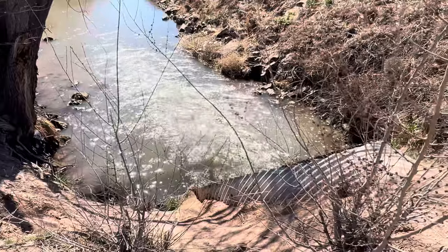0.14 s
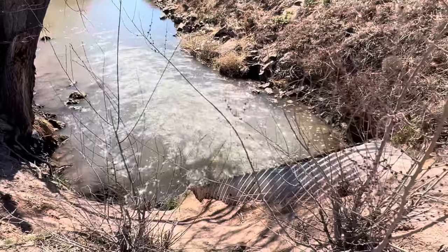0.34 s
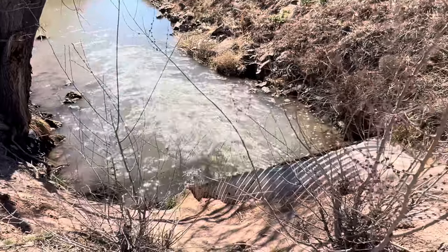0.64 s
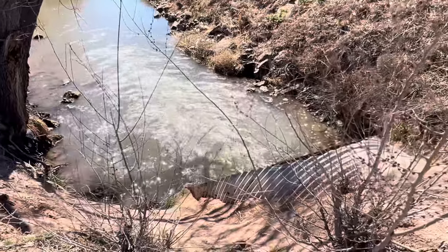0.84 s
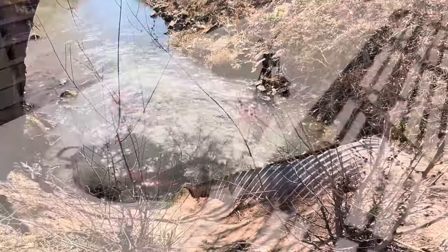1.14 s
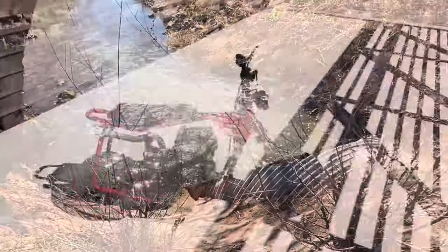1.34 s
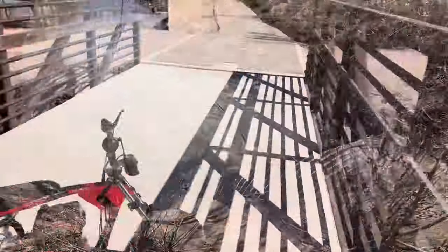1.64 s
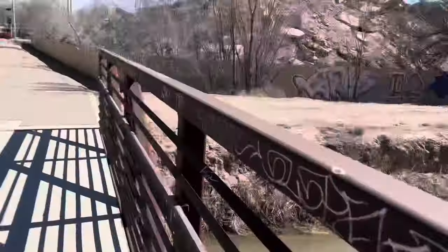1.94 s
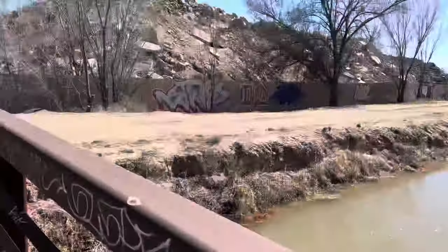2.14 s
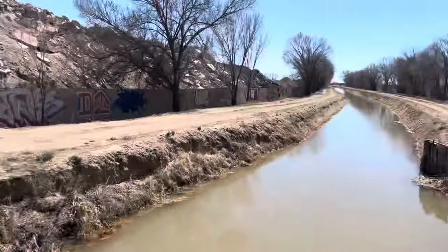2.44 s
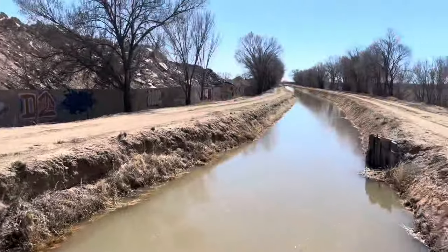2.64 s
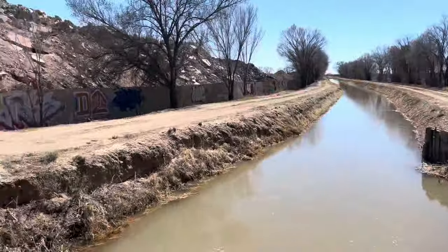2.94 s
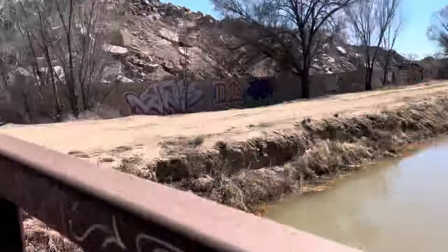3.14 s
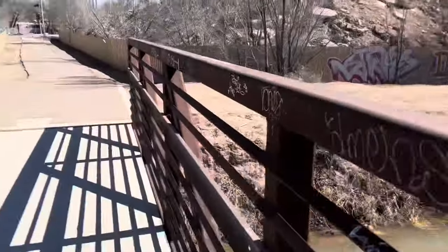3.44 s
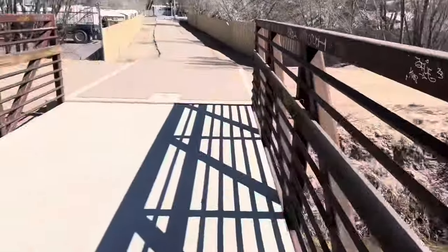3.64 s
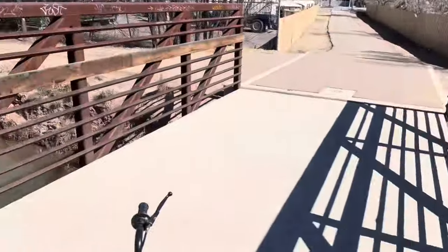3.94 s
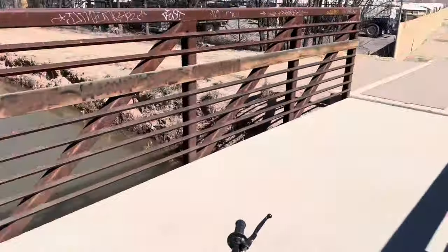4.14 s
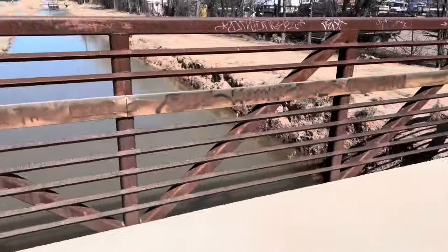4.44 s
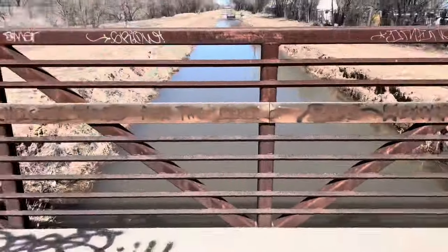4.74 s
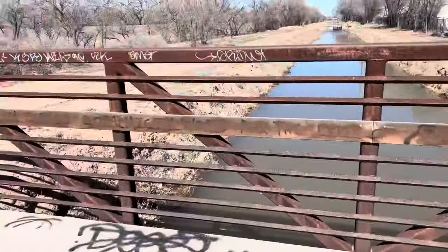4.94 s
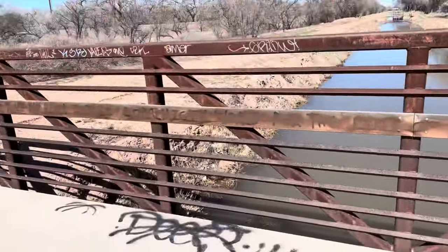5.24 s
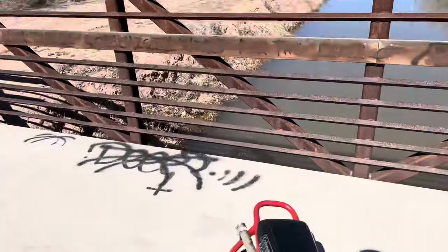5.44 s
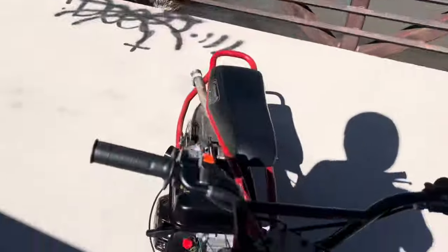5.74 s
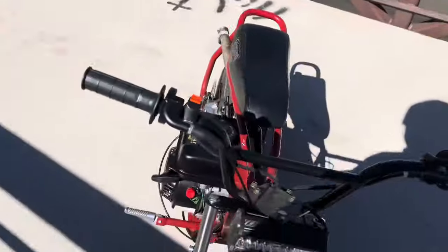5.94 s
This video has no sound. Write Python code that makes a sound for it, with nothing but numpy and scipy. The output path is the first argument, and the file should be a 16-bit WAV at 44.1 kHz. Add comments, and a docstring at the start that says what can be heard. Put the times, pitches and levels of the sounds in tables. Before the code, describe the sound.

Quiet creek trickle with soft wind bumps on the microphone gives way to a small single-cylinder motorbike idling unevenly close by, chugging and clattering metallically.

```python
"""A quiet creek bank first: wind rumbles and bumps on the microphone, water trickles, ticks and plops.
From about one second the bank dissolves into a concrete footbridge where a mini bike idles close by.
Its single-cylinder four-stroke fires unevenly about 13 times a second: each firing knocks with a falling
pitch, thumps from the muffler, barks from the tailpipe and rings the fins; valves clack, covers clatter.
The listener walks round it, beside, then behind, then over; one cover rings on late in the walk."""
import sys
import numpy as np
from scipy import signal
from scipy.fft import rfft, irfft, next_fast_len
from scipy.io import wavfile
from scipy.ndimage import uniform_filter1d, map_coordinates

SR = 44100
rng = np.random.default_rng(int(sys.argv[2]) if len(sys.argv) > 2 else 0)


def int16_out(signal):
    """Quantize to a 16-bit WAV file."""
    q = np.round(np.clip(np.atleast_2d(signal).T, -1, 1) * 32767)
    wavfile.write(sys.argv[1], SR, q.astype(np.int16))


N = 268569

# crossfade from the creek bank to the bridge
FADE_START_S, FADE_S = 0.96, 0.95
# gusts on the creek bank: start_s [s], level_db [dB]
GUSTS = [(0, -32), (0.13, -44), (0.3, -38.5), (0.5, -44.5), (0.66, -38), (1, -40)]
# colour of wind on the microphone: pitch_hz [Hz], level_db [dB]
WIND_COLOUR = [(15, -55), (26, -34), (36, -18), (55, 15.5), (95, 3.5), (150, 0.5), (300, -7.5), (600, -68)]
# colour of the running creek: pitch_hz [Hz], level_db [dB]
CREEK_COLOUR = [(100, -11), (300, 1), (550, -1), (1100, -3), (2000, -13), (3500, -16.5), (5600, -26.5),
                (8000, -19.5), (11000, -37), (15000, -51)]
BRIDGE_WIND_DB, CREEK_DB = -43, -51.5
# tiny bubbles bursting in the creek: rate, middle pitch, level of the faintest
DRIPS_PER_S, DRIP_HZ, DRIP_MIN_DB = 60, 4800, -60.5
# soft bumps on the microphone: centre_s [s], level_db [dB], length_s [s]
BUMPS = [(0.066, -29.5, 0.007), (0.19, -39, 0.0086), (0.237, -30.5, 0.0053), (0.616, -41, 0.034),
         (0.655, -42, 0.0062), (0.706, -39.5, 0.019), (0.778, -46, 0.011), (0.91, -36.5, 0.018),
         (0.981, -35, 0.0091)]
# colour of the noise in a bump: pitch_hz [Hz], level_db [dB]
BUMP_COLOUR = [(50, -3.5), (130, -0.5), (330, -3.5), (480, -13.5), (900, -27), (2000, -61)]
# small plops in the creek: start_s [s], pitch_hz [Hz], level_db [dB, relative]
PLOPS = [(.298, 1100, -49.5), (0.349, 2450, -55), (0.358, 1040, -49), (0.393, 1010, -57)]

# the listener's path round the bike: time_s [s], left_ear_lead_ms [ms]
PATH = [(1, 0.17), (1.8, 0.43), (2.6, 0.31), (3.4, 0.36), (4, 0.34), (4.4, 0.27), (4.8, 0.15), (5.3, 0.14),
        (5.9, 0.32)]
# when the listener stands beside, behind and over the bike: time_s [s]
STATIONS = [3.5, 4.73, 5.88]
# the lope of the idle, strong and weak firings often taking turns: start_s [s], muffler thump_db [dB],
# tailpipe bark_db [dB], combustion knock_db [dB], valve clack_db [dB]
FIRINGS = [(0.983, -14.0, -25.0, -22, -30), (1.065, -17, -26.0, -29, -30.5), (1.1438, -17.5, -27, -22, -31),
           (1.2229, -16, -17.5, -22, -31), (1.301, -12, -21, -21, -26), (1.3798, -14, -24, -21, -31),
           (1.4613, -24.5, -21, -25, -26), (1.5368, -14, -26.0, -21, -24.5), (1.617, -23, -24, -23, -25),
           (1.6932, -22, -27, -26, -20), (1.769, -13.5, -21, -17, -19.5), (1.846, -17, -35.0, -19, -18),
           (1.924, -20.5, -26.5, -20.5, -21.5), (2.0, -17.5, -26, -23, -21), (2.077, -13.5, -30, -18, -23),
           (2.1554, -15.5, -37, -18.5, -21.5), (2.2335, -18.5, -36.0, -22, -22.5),
           (2.31, -15.5, -44, -19.5, -23), (2.3884, -12.5, -32, -17.5, -27),
           (2.468, -16.0, -33, -19.5, -31), (2.5482, -18.0, -33, -19, -34), (2.627, -19, -40, -21.5, -27),
           (2.7071, -13, -31, -19.5, -29), (2.79, -24, -29.0, -42, -25), (2.8664, -14, -34, -19, -28),
           (2.9458, -28.0, -29.5, -28, -32), (3.025, -17, -36, -18, -22.5), (3.104, -25, -25, -26, -22.5),
           (3.1819, -11.5, -24.5, -16, -25), (3.262, -24, -20.5, -29, -22), (3.341, -16.0, -27, -16, -28),
           (3.418, -28, -20, -23, -31), (3.4974, -14.5, -24, -15.5, -30),
           (3.5759, -15.5, -22.5, -15.5, -30), (3.6551, -16.5, -26.0, -17.5, -23),
           (3.7322, -23, -16.5, -24, -20.5), (3.809, -18, -23, -15, -22), (3.8862, -22.0, -17.5, -22, -25),
           (3.9622, -16.5, -20, -18, -25.5), (4.038, -16, -18, -20, -23), (4.1183, -17, -20, -31, -22),
           (4.19, -12.5, -16.5, -15.5, -21.5), (4.267, -20, -16.5, -23, -17.5),
           (4.3441, -11.5, -13.0, -16.5, -20), (4.4225, -10.0, -11.5, -11.5, -30),
           (4.5026, -20, -15.0, -19, -25), (4.582, -11.0, -11.5, -14.5, -28),
           (4.6637, -21.0, -14.5, -22, -25), (4.7439, -10.0, -10.5, -13, -35),
           (4.829, -20, -12.0, -30, -30), (4.9059, -13.5, -12.5, -15.5, -22),
           (4.9873, -15.5, -15, -16, -28), (5.0684, -14, -14.0, -20.5, -28), (5.149, -16, -15.5, -17, -30),
           (5.23, -27, -15.0, -20, -35), (5.3079, -14, -16, -17, -26), (5.3884, -28, -13.5, -18, -20),
           (5.469, -14, -18, -23.5, -21), (5.5426, -12, -18.5, -14.5, -19), (5.62, -17.5, -16, -18.5, -17),
           (5.6971, -10.5, -17.5, -13.5, -18), (5.7778, -24, -14, -20, -22), (5.853, -11, -19, -13.5, -29),
           (5.9345, -26, -13, -22, -35), (6.0093, -10.0, -15, -13.5, -26)]

# impacts in one engine cycle: position [share of the cycle], half_rise_s [s], decay_s [s],
# crankcase_db [dB], shroud_db [dB], rocker_db [dB], tin_db [dB]
IMPACTS = [(.035, 0.0031, 0.014, 1.5, 2, 4, 0.5), (.27, 0.004, 0.014, -3, -3, -4, -1.5),
           (.51, .002, .013, -15, -14, -1.5, -1.5)]
# the shaking eases while the piston slows on compression
LULL_DB, LULL_BEFORE_S, LULL_WIDTH_S = -3, 0.011, 0.0047
TICKS_PER_S = 160  # loose parts that click on their own
# broad colour of crankcase, fan shroud, rocker cover and tin covers: pitch_hz [Hz], level_db [dB]
CASE_COLOUR = [(120, -1.5), (300, -6.5), (520, -0.5), (800, -4.5), (1100, -11), (2000, -54)]
SHROUD_COLOUR = [(500, -20.5), (850, 1.5), (1400, 3), (1700, 0), (2200, -71), (4000, -50)]
ROCKER_COLOUR = [(1200, -20.5), (1800, 2.5), (2700, -0.5), (3300, -9.5), (4200, -5.5), (7000, -49)]
TIN_COLOUR = [(2200, -24), (3400, -2.5), (5000, 2.5), (6700, 4), (7300, -2), (8400, 1.5), (10300, -3),
              (12300, -7), (13800, -15), (15500, -8.5)]
# resonances of the same parts: pitch_hz [Hz], width_hz [Hz],
# then strength against the colour from beside_db, behind_db, over_db [dB]
CASE_MODES = [(409, 37, -16, 9.5, -3), (536, 107, 5, -31, 10), (596, 116, 9, 5, -4), (740, 45, 7, 13, 5)]
SHROUD_MODES = [(1070, 73, 3, 1.5, -5), (1260, 120, -12, 4, -5), (1376, 59, 3, -4.5, 2.5)]
ROCKER_MODES = [(2010, 28, -1, -6, -14), (2414, 35, -1.5, -1, -5), (2695, 31, -10, -17, -11)]
TIN_MODES = [(3210, 160, 5, 8.9, 5), (4350, 24, 8, 4, -4), (4540, 30, 7, 8, 4), (6510, 23, 5, 1, -10),
             (8150, 220, -5, 5.7, 0), (10800, 220, -1, 4.7, 6), (11590, 160, -14, 5, -3)]
# likeness of the clatter at the two ears: pitch_hz [Hz], likeness [0 to 1]
CLATTER_LIKENESS = [(300, 0.98), (550, 0.99), (1100, 0.78), (2000, 0.63), (4000, 0.092), (6500, 0.15),
                    (8200, 0.25), (10000, 0.97)]
# clatter along the walk: time_s [s], crankcase_db [dB, relative], top_end_db [dB, relative]
CLATTER = [(2, -33.5, -28), (2.7, -31.5, -29.5), (3.2, -31, -28), (4, -26.5, -24), (4.8, -27.5, -28),
           (5.4, -26, -28), (6, -22.5, -28.5)]
CASE_DB = -3  # over the crankcase column
SHROUD_DB, ROCKER_DB, TIN_DB = -1, -5, -5.5  # over the top end column
# lean of the tin covers: pitch_hz [Hz], left_over_right_db [dB]
TIN_SIDE = [(2800, 11.5), (4000, 5.5), (6300, 10.5), (8500, 2), (11000, -0.5)]
# fixed phase between left and right in the high treble, laid on the tin covers' part: pitch_hz [Hz], left_lead
# [radians]
TREBLE_PHASE = [(6000, 2.2), (8200, .3), (9000, -1), (10000, -3.1), (10600, -3.2), (11500, -6.1),
                (12800, -6.3), (13400, -9.3), (14200, -9.4), (14900, -12.5)]
# change of the tin covers' colour from above: pitch_hz [Hz], change_db [dB]
TIN_ABOVE = [(3300, 2), (4800, -3.5), (6200, -4), (8200, 1), (11500, 0.5)]

# tappet click: pitch_hz [Hz], level_db [dB], swell_s [s]
TAPPET = [(2670, -3.5, .0035)]
# the knock falls steeply as the pressure wave spreads; it starts this far above its final pitch
KNOCK_DROP_HZ, KNOCK_FALL_S, KNOCK_SWELL_S, KNOCK_DB = 3313, 0.001643, 0.004016, 3.5
# the knock is deeper behind the bike: time_s [s], final pitch_hz [Hz]
KNOCK_END = [(3.1, 297), (4.3, 139)]
# the block under the combustion: pitch_hz [Hz], level_db [dB], swell_s [s]
BLOCK = [(1393, -5.5, 0.00499), (1250, -2.5, 0.00161), (2300, -5, 0.001125)]
# ring of cooling fins and flywheel: pitch_hz [Hz], level_db [dB], t60_s [s]
FINS = [(1039, -16.5, 0.14), (1394, -12.5, 0.12), (1590, -20, .08), (2427, -19, 0.19), (3540, -25, 0.1),
        (4430, -24, 0.22), (4490, -24, 0.18), (6440, -28, 0.3)]
# the fins are clearest behind the bike: time_s [s], level_db [dB]
FINS_HEARD = [(3.6, -8), (4.9, 2), (5.7, -2)]
# the muffler's deep push: pitch_hz [Hz], level_db [dB], swell_s [s]
MUFFLER = [(157.7, 1, 0.0121), (73.5, -12, 0.02356)]
# the tailpipe's bark and the ring after it: pitch_hz [Hz], level_db [dB], swell_s [s]
PIPE = [(292, -1, 0.00886), (440, -7, 0.008), (240, -10.5, 0.02094)]
# air drawn in after the exhaust stroke: pitch_hz [Hz], level_db [dB], swell_s [s]
INTAKE = [(68, -31.5, 0.015)]
# clack of a valve shutting in mid-cycle, through head and case: pitch_hz [Hz], level_db [dB], swell_s [s]
VALVE = [(2710, -6, .0042), (2330, -3, .0036), (1380, -5.5, .0065), (688, -5, .0105), (494, -10.5, .0175)]
# tail of deck and railings: pitch_hz [Hz], t60_s [s]
BRIDGE_TAIL = [(150, 0.025), (1000, 0.38), (4000, 0.6), (12000, 0.32)]
# one hard firing sets a loose cover ringing
PING_S, PING_HZ, PING_DB, PING_T60_S = 4.745, 4450, -34, 0.8
TOP_HZ = 15850  # upper band limit of the recorder


def amp(db):
    """Decibels to gain."""
    return 10 ** (np.asarray(db) / 20)


def unit(x):
    """Scale to rms 1."""
    return x / np.sqrt(np.mean(x ** 2) + 1e-20)


def along(points, hz):
    """(Hz, value) points read on a log frequency axis."""
    f, v = np.transpose(points)
    return np.interp(np.log(hz + 1), np.log(f + 1), v)


def curves(rows):
    """One value per sample for each column after the time."""
    s, *columns = np.transpose(rows)
    return [np.interp(np.arange(N) / SR, s, column) for column in columns]


def wobble(rate):
    """A smooth random curve, rate knots a second."""
    knots = rng.standard_normal(int(N * rate / SR) + 4)
    return map_coordinates(knots, [np.arange(N) * rate / SR])


def filtered(x, response):
    """Filter x by a complex response of frequency."""
    m = next_fast_len(N + SR // 2)
    return irfft(rfft(x, m) * response(np.fft.rfftfreq(m, 1 / SR)), m)[..., :N]


def add(track, s, sound):
    """Mix a sound into a track at time s."""
    part = track[max(round(s * SR), 0):][:len(sound)]
    part += sound[:len(part)]


def spread(pair, likeness):
    """Two unrelated signals become left and right with a given likeness."""
    def mid_side_gains(hz):
        turn = np.arccos(np.clip(along(likeness, hz), -1, 1)) / 2
        return np.array([np.cos(turn), np.sin(turn)])

    mid, side = filtered(pair, mid_side_gains)
    return np.array([mid + side, mid - side])


def rush(colour, likeness):
    """Coloured stereo noise of rms 1."""
    noise = spread(rng.standard_normal((2, N)), likeness)
    return unit(filtered(noise, lambda hz: amp(along(colour, hz))))


def dissolve():
    """Share of the bridge in the sound, rising from 0 to 1."""
    return np.clip((np.arange(N) / SR - FADE_START_S) / FADE_S, 0, 1)


def wind(bank):
    """Low noise of moving air on the microphone, following the gusts and then steadier on the bridge."""
    level_db = bank * curves(GUSTS)[0] + (1 - bank) * BRIDGE_WIND_DB
    return amp(level_db + 0.77 * wobble(18)) * rush(WIND_COLOUR, [(60, 0.79)])


def creek(bank):
    """Running water as coloured noise whose level trickles at a slow and a fast rate."""
    trickle = amp(1.3 * wobble(39.8) + 2.1 * wobble(400))
    water = rush(CREEK_COLOUR, [(300, 0.68), (1400, 0.16), (7000, 0.43)])
    return bank * amp(CREEK_DB) * unit(trickle) * water


def drips():
    """Single tiny bubbles tick in the water; higher ones die sooner."""
    out, t = np.zeros(N), np.arange(SR // 60) / SR
    span = FADE_START_S + FADE_S
    for when, pitch, size in rng.random((int(DRIPS_PER_S * span), 3)):
        hz = DRIP_HZ * 2 ** (1.8 * (pitch - .5))
        tick = np.exp(-t * hz / 6) * np.sin(2 * np.pi * hz * t)
        add(out, when * span, amp(DRIP_MIN_DB + 14 * size ** 2) * tick)
    return out


def bumps():
    """Soft bumps on the microphone: a swell of low noise and one short push on the case."""
    t = np.arange(N) / SR
    swell = sum(amp(db) * np.exp(-((t - s) / length) ** 2 / 2) for s, db, length in BUMPS)
    out = swell * rush(BUMP_COLOUR, [(200, 0.7)])
    for s, db, _ in BUMPS:
        u = (t - s) / 0.0011
        out = out + amp(db) * (1 - u ** 2) * np.exp(-u ** 2 / 2)
    return out


def plops():
    """A few bubbles each; a bubble's pitch rises as it nears the surface."""
    out, age = np.zeros(N), np.arange(SR // 12) / SR
    shape = age / 0.0035 * np.exp(1 - age / 0.0027)
    for s, hz, db in PLOPS:
        for late, size in rng.standard_normal((4, 2)):
            cycles = hz * (1 + 0.06 * size) * age * (1 + 1.7 * age)
            add(out, s + 0.013 * abs(late), amp(db + 5.0) * shape * np.sin(2 * np.pi * cycles))
    return out


def outdoors():
    """Wind and bumps on the microphone, creek and bubbles by the bank."""
    bank = 1 - dissolve()
    return wind(bank) + creek(bank) + bank * drips() + bumps() + plops()


def shaking(index, steady_db, force, jitter, vary_db):
    """How hard one part is shaken: three impacts a cycle over steady rubbing; strong firings hit harder."""
    times, thump_db, *_ = np.transpose(FIRINGS)
    vigour_db = thump_db - uniform_filter1d(thump_db, size=5)
    power, lull, t = np.zeros(N), np.zeros(N), np.arange(SR // 10) / SR
    dip = np.exp(-((t - t.mean()) / LULL_WIDTH_S) ** 2 / 2)
    for s, period, vigour in zip(times, np.gradient(times), vigour_db):
        add(lull, s - LULL_BEFORE_S - t.mean(), dip)
        for share, half_rise, decay, *levels in IMPACTS:
            rise = 2 * half_rise
            shape = np.exp(-np.maximum(t - rise, 0) / decay) * np.minimum(t / rise, 1)
            db = levels[index] + force * vigour * (1 - share) + rng.normal(0, vary_db)
            start = s + share * period - rise + rng.normal(0, jitter)
            add(power, start, (amp(db) * shape) ** 2)
    return unit(np.sqrt(power + amp(steady_db) ** 2) * amp(LULL_DB * lull))


def patchy(x, depth_db):
    """The treble shifts in colour at random from moment to moment."""
    hz, _, z = signal.stft(x, SR, nperseg=256)
    field = rng.standard_normal(z.shape[1:])
    field = uniform_filter1d(uniform_filter1d(field, 5, 0), 7, 1)
    treble = along([(4000, 0), (9000, 1)], hz)[:, None]
    return signal.istft(z * amp(depth_db * treble * unit(field)), nperseg=256)[1][:, :N]


def rattle(shake, colour, modes, grain_db, tick_db, ring_db, t60):
    """Tiny contacts and single clicks ring one part; its resonances stand out by where one listens."""
    ticks = unit((rng.random(N) < TICKS_PER_S / SR) * rng.uniform(-1.16, 1, (2, N)))
    grain = rng.standard_normal((2, N)) * amp(grain_db * wobble(700))
    contacts = shake * spread(grain + amp(tick_db) * ticks, CLATTER_LIKENESS)
    contacts = patchy(contacts, depth_db=3)
    t, out = np.arange(SR // 12) / SR, 0
    for k, here in enumerate(np.eye(len(STATIONS))):
        metal = rng.standard_normal(len(t)) * amp(-60 * t / t60)
        metal = metal[None] / np.linalg.norm(metal)
        rung = contacts + amp(ring_db) * signal.oaconvolve(contacts, metal, axes=1)[:, :N]

        def response(f):
            peaks = sum(amp(db[k]) * 1j * f * w / (c * c - f * f + 1j * f * w) for c, w, *db in modes)
            return amp(along(colour, f)) * (1 + peaks)

        nearness = np.interp(np.arange(N) / SR, STATIONS, here)
        out = out + nearness * filtered(rung, response)
    return unit(out)


def clatter():
    """Crankcase, fan shroud and rockers answer the same cycle of impacts."""
    case_db, top_db = curves(CLATTER)
    shake = shaking(index=0, steady_db=-3.5, force=0.05, jitter=0.00076, vary_db=0.0)
    case = rattle(shake, CASE_COLOUR, CASE_MODES, grain_db=1.0, tick_db=-5.5, ring_db=-20.5, t60=0.026)
    shake = shaking(index=1, steady_db=-7, force=0.14, jitter=0.00074, vary_db=1.5)
    shroud = rattle(shake, SHROUD_COLOUR, SHROUD_MODES, grain_db=2.0, tick_db=-10, ring_db=-13.5, t60=0.049)
    shake = shaking(index=2, steady_db=-7, force=0.068, jitter=0.0008, vary_db=1.4)
    rocker = rattle(shake, ROCKER_COLOUR, ROCKER_MODES, grain_db=0.4, tick_db=-6.5, ring_db=-8.0, t60=0.067)
    return amp(case_db + CASE_DB) * case + amp(top_db + SHROUD_DB) * shroud + amp(top_db + ROCKER_DB) * rocker


def covers():
    """The tin covers sizzle, mainly to the left, and change colour as heard from above."""
    shake = shaking(index=3, steady_db=-13, force=0.011, jitter=0.001, vary_db=1.04)
    tin = rattle(shake, TIN_COLOUR, TIN_MODES, grain_db=0.45, tick_db=-10.5, ring_db=-7, t60=0.023)
    tin = amp(curves(CLATTER)[1] + TIN_DB) * tin

    def lean_and_phase(hz):
        lean = amp(np.outer([1, -1], along(TIN_SIDE, hz)) / 2)
        return lean * np.exp(1j * np.outer([1, 0], along(TREBLE_PHASE, hz)))

    tin = filtered(tin, lean_and_phase)
    from_above = filtered(tin, lambda hz: amp(along(TIN_ABOVE, hz)))
    above = np.interp(np.arange(N) / SR, [3.8, 5.4], [0, 1])
    return tin + above * (from_above - tin)


def blows(levels_db, modes, delay, sharpness, scatter, vary_db, rough):
    """Each firing sets off resonances that swell and die, roughened by a fast random wobble."""
    out, t = np.zeros(N), np.arange(SR // 12) / SR
    chance = rng.standard_normal((len(FIRINGS), len(modes), 2))
    for (s, *_), db, draws in zip(FIRINGS, levels_db, chance):
        for (hz, level, swell), (detune, size) in zip(modes, draws):
            shape = (t / swell * np.exp(1 - t / swell)) ** sharpness
            wave = np.cos(2 * np.pi * hz * (1 + scatter * detune) * (t - swell))
            add(out, s + delay, -amp(db + level + vary_db * size) * shape * wave)
    return out * (1 + rough * wobble(900))


def knocks(sharpness, scatter):
    """Each combustion sends out one short wave of steeply falling pitch."""
    out, t = np.zeros(N), np.arange(SR // 40) / SR
    shape = (t / KNOCK_SWELL_S * np.exp(1 - t / KNOCK_SWELL_S)) ** sharpness
    for (s, _, _, db, _), detune in zip(FIRINGS, rng.standard_normal(len(FIRINGS))):
        end_hz = np.interp(s, *np.transpose(KNOCK_END))
        hz = end_hz + KNOCK_DROP_HZ * (1 + scatter * detune) * np.exp(-t / KNOCK_FALL_S)
        cycles = np.cumsum(hz) / SR
        # the wave is at its trough when the swell peaks
        cycles = cycles - np.interp(KNOCK_SWELL_S, t, cycles)
        add(out, s, -amp(db + KNOCK_DB) * shape * np.cos(2 * np.pi * cycles))
    return out


def fins(times, levels_db, vary_db):
    """Every blow rings the fins with a new mix of their decaying modes."""
    out, t = np.zeros(N), np.arange(SR // 6) / SR
    hz, level, t60 = np.transpose(FINS)[:, :, None]
    ring = amp(level - 60 * t / t60) * np.exp(2j * np.pi * hz * t) * (1 - np.exp(-t / 0.0015))
    for s, db, (size, turn) in zip(times, levels_db, rng.standard_normal((len(times), 2, len(FINS)))):
        mix = amp(db + vary_db * size) * np.exp(2j * np.pi * turn)
        add(out, s, (mix @ ring).real)
    return out


def bridge(x):
    """Deck and steel railings scatter a short tail, as decaying noise."""
    hz, t, z = signal.stft(rng.standard_normal((2, SR // 3)), SR, nperseg=256)
    decay = amp(-60 * t / along(BRIDGE_TAIL, hz)[:, None])
    tail = signal.istft(z * decay, SR, nperseg=256)[1]
    return signal.fftconvolve(x[None], tail / np.linalg.norm(tail[0]), axes=1)[:, :N]


def ping():
    """A cover rings on through several cycles."""
    t = np.maximum(np.arange(N) / SR - PING_S, 0)
    return amp(PING_DB - 60 * t / PING_T60_S) * np.sin(2 * np.pi * PING_HZ * t) * (1 + .35 * wobble(90))


def engine():
    """Each firing's knock, thump, bark, gulp and clack; the bike stands a little to the left."""
    times, thump_db, bark_db, knock_db, clack_db = np.transpose(FIRINGS)
    tappet = blows(clack_db, TAPPET, delay=-0.0031, sharpness=4.6, scatter=0.025, vary_db=1, rough=.25)
    knock = knocks(sharpness=5.4, scatter=.05)
    block = blows(knock_db, BLOCK, delay=0.001015, sharpness=4, scatter=.03, vary_db=0.5, rough=0.12)
    ring = fins(times + .002, knock_db - 6.5, vary_db=1.0) + fins(times + 0.042, clack_db + 1, vary_db=0.5)
    ring = ring * amp(curves(FINS_HEARD)[0]) + ping()
    thump = blows(thump_db, MUFFLER, delay=0.0034, sharpness=7.4, scatter=0.014, vary_db=0.1, rough=0.14)
    bark = blows(bark_db, PIPE, delay=0.0123, sharpness=6.1, scatter=0.054, vary_db=-0.23, rough=0.43)
    steady_db = np.zeros(len(FIRINGS))
    gulp = blows(steady_db, INTAKE, delay=0.02014, sharpness=8.2, scatter=0.068, vary_db=2.0, rough=0.094)
    valve = blows(clack_db, VALVE, delay=.036, sharpness=6, scatter=0.027, vary_db=1, rough=.2)
    firing = tappet + knock + block + ring + thump + bark + gulp + valve
    # the firing sounds carry almost no deep bass
    firing = filtered(firing, lambda hz: amp(along([(24, -39), (50, -1.0)], hz)))
    left, right = firing + amp(-18) * bridge(firing) + clatter()
    lag = curves(PATH)[0] * SR / 10 ** 3  # milliseconds to samples
    right = map_coordinates(right, [np.arange(N) - lag], order=5)
    return covers() + np.array([left, right])


def scene():
    """The creek bank, then the idling bike on the bridge, in the open air."""
    return outdoors() + dissolve() * engine()


def record(dry):
    """The recorder keeps nothing above its band limit."""
    return filtered(dry, lambda hz: hz < TOP_HZ)


dry = scene()
out = record(dry)
int16_out(out)
```